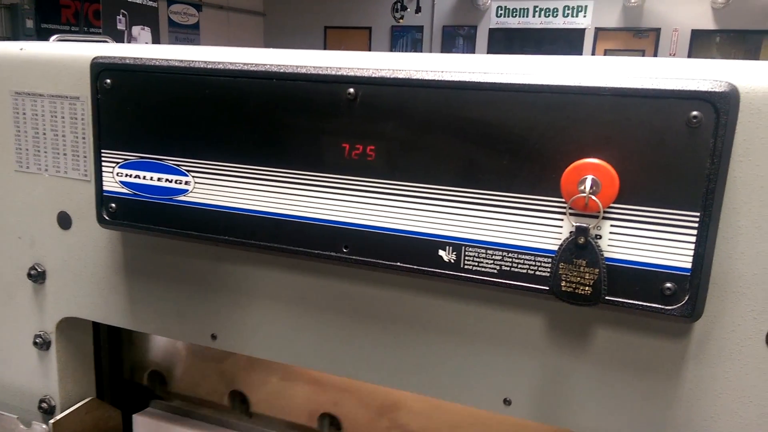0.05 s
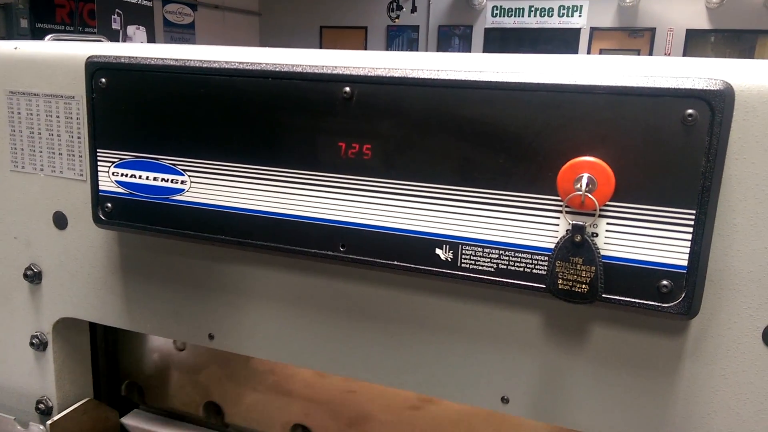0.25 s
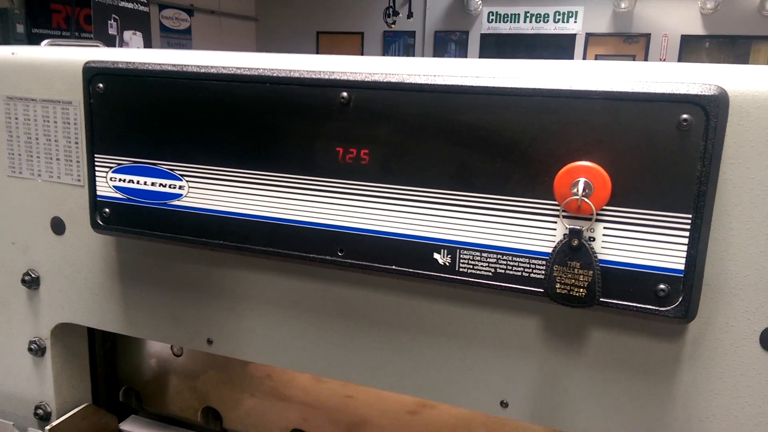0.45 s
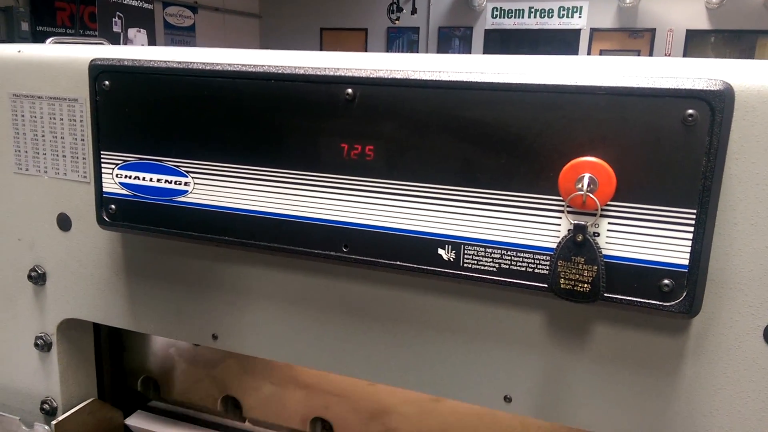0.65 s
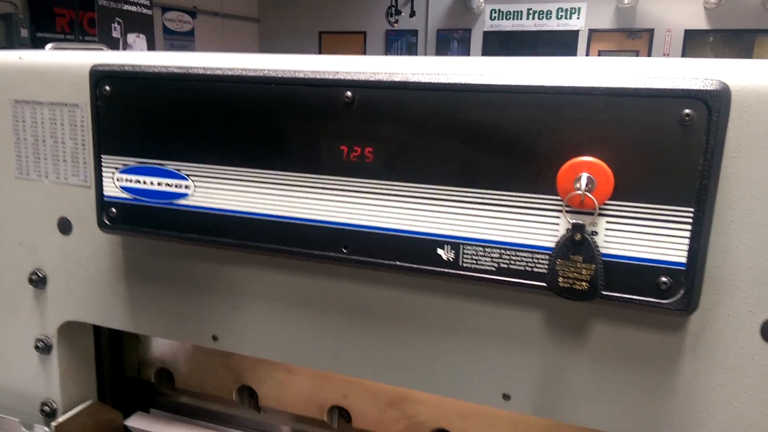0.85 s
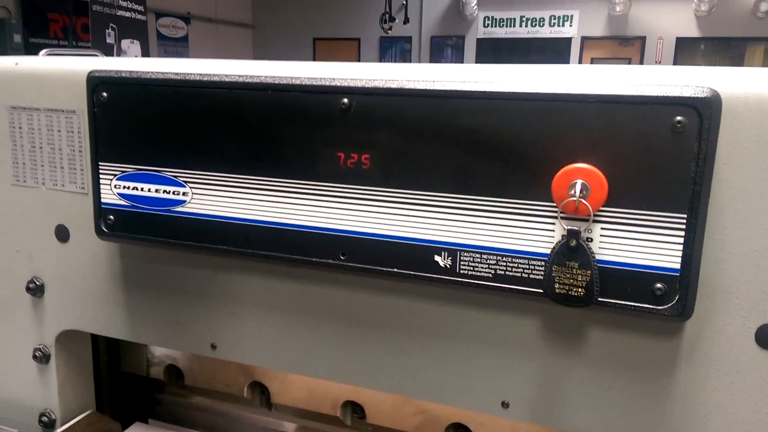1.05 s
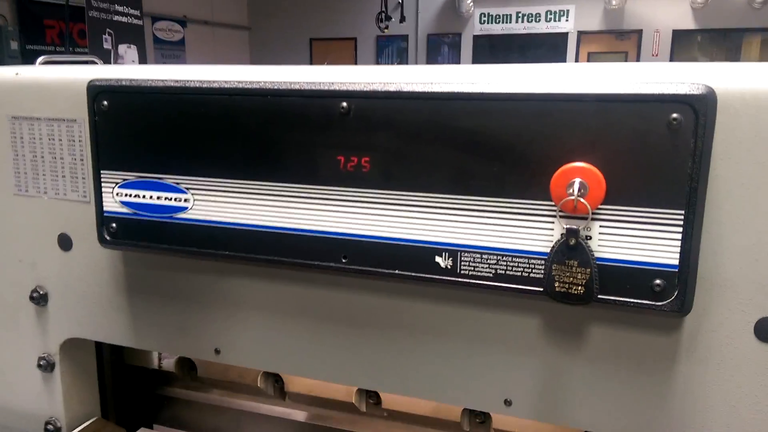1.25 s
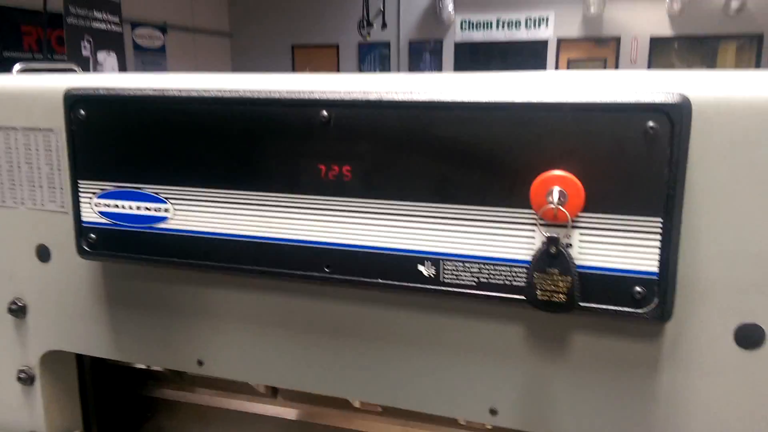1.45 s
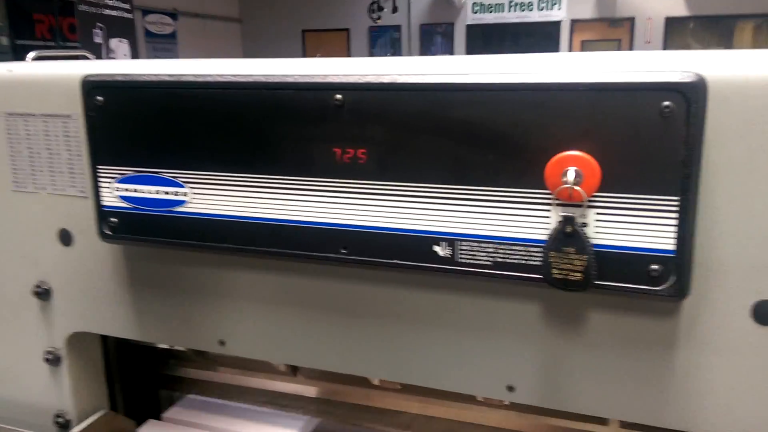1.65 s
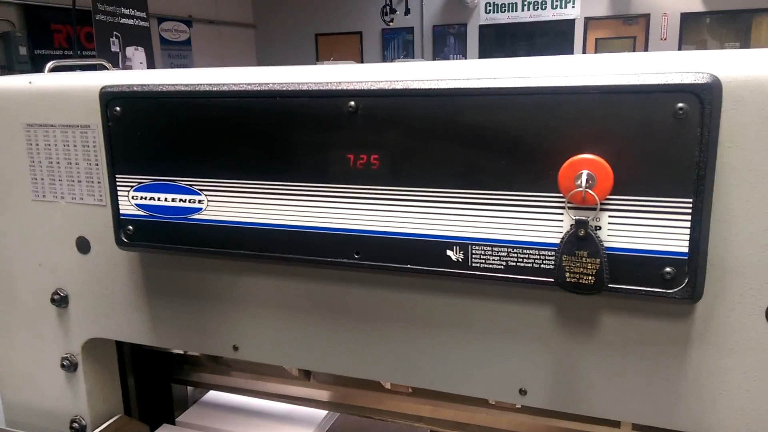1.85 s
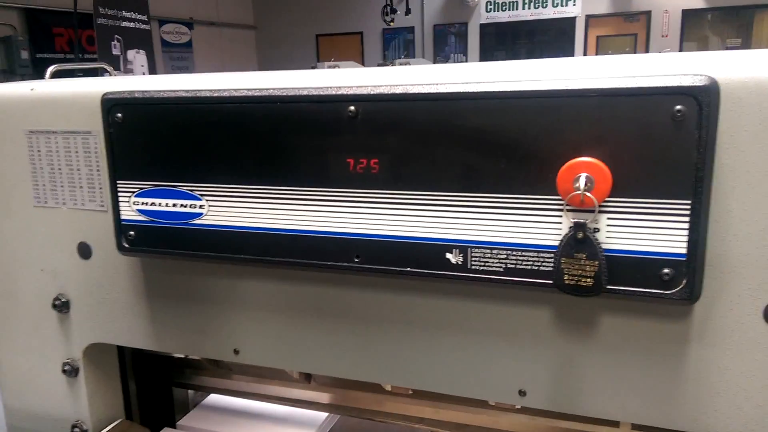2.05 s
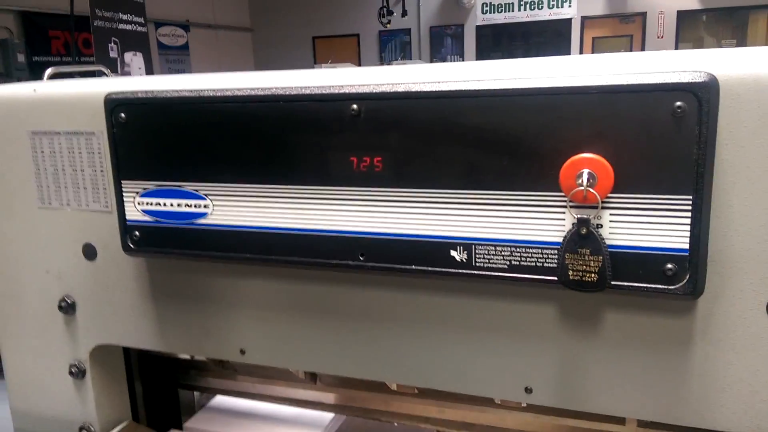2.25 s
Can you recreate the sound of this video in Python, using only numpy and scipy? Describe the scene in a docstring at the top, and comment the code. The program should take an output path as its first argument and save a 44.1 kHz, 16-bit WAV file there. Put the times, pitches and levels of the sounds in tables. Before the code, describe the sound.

Close up, a paper guillotine clacks, hisses with a short squeal, then clamps and shears a stack with quick, ringing thuds. Two more knocks follow as it returns, echoing in the workshop over a steady motor hum and pump whine.

```python
"""A pump hums and whines, then a hydraulic paper guillotine makes one cut, close by in a workshop.
The vane pump clatters with each shaft turn and runs slower under load. A valve clacks, oil hisses and
squeals through it, the clamp lands, the blade shears the stack and bottoms out; then blade and clamp
knock home. Every blow rings the heavy frame and its steel panels into the room."""
import sys
import numpy as np
from scipy import signal
from scipy.fft import rfft, irfft, next_fast_len
from scipy.io import wavfile
from scipy.ndimage import uniform_filter1d, map_coordinates

SR = 44100
rng = np.random.default_rng(int(sys.argv[2]) if len(sys.argv) > 2 else 0)


def file_out(sig):
    """Save sig as 16-bit WAV at sys.argv[1]."""
    # one column per channel
    cols = np.atleast_2d(sig).T
    # limit, then scale
    lim = np.clip(cols, -1, 1)
    pcm = np.round(lim * 32767).astype(np.int16)
    wavfile.write(sys.argv[1], SR, pcm)


N = 101429
T = np.arange(N) / SR

# Workshop reverberation. Each row: band centre in Hz, level in dB, t60 in seconds.
ROOM_BANDS = [(100, -3.5, 0.37), (253, -9, 1.34), (720, -4.5, 1), (2000, -11, 1.75), (4870, -8, 1.3),
              (12000, -19, 0.95)]
# Microphone pair: side against mid; duller right side. Each row: frequency in Hz, gain in dB.
SIDE_GAIN = [(100, -19), (200, -20), (500, -10.5), (1000, 0.5), (3000, -1)]
RIGHT_MIC_GAIN = [(100, -1), (700, -1.5), (2000, -1), (3000, -4.5), (4200, -9), (6000, -13.5), (8000, -7),
                  (14000, -4)]
# Motor mains hum. Each row: frequency in Hz, level in dB.
HUM_TONES = [(114, -56), (232, -52)]
# Pump shaft. Each row: time in seconds, speed in turns per second.
SHAFT_SPEED = [(0, 28.8), (.14, 28.6), (.5, 28.5), (.8, 29.54), (1.0, 29.58), (1.54, 29.59), (1.68, 29.42),
               (1.85, 29.6), (2.1, 29.76), (2.3, 29.8)]
# Pump pressure. Each row: time in seconds, share from 0 to 1.
PUMP_PRESSURE = [(0, 1), (.5, 1), (.8, 0.24), (2.3, 0)]
# Pump whine. Each row: multiple of shaft rate, free level in dB, loaded level in dB.
WHINE_HARMONICS = [(4, -55, -49), (8, -51, -48), (12, -49, -54), (24, -43, -45), (34, -56, -55),
                   (36, -51, -44), (37, -62, -57), (48, -50.5, -58), (60, -54.5, -50), (61, -54, -60),
                   (72, -54.5, -51), (81, -58, -54), (84, -55.5, -53), (145, -60, -62), (171, -58, -60),
                   (174, -57, -59), (178, -59, -60), (204, -59, -61)]
# Envelopes. Each row: time in seconds, relative level in dB.
CLATTER_LEVEL = [(0, 5), (.2, 5.5), (.7, 7), (.9, 2.5), (1.3, 2), (1.55, 3), (1.8, 3.5), (2.3, 1)]
OIL_LEVEL = [(.22, -70), (.26, -36), (.39, -34.5), (.43, -29), (.53, -48), (.6, -29), (.68, -38.5),
             (.85, -97)]
SQUEAL_LEVEL = [(.32, -50), (.35, -34), (.375, -32), (.389, -29.5), (.412, -43)]
PAPER_LEVEL = [(.418, -85), (.428, -43), (.47, -45), (.535, -47), (.553, -34), (.585, -46), (.62, -52),
               (.65, -45), (.72, -75)]
# Noise spectra. Each row: frequency in Hz, relative density in dB.
AIR_SPECTRUM = [(25, 16.5), (60, 2.5), (120, 4), (200, 5.5), (450, -6.5), (900, -3), (1300, -9.5),
                (2400, -16.5), (5500, -23), (9000, -21.5), (12000, -29), (16000, -35)]
CLATTER_SPECTRUM = [(100, -16), (500, -0.5), (850, -9), (1250, -9), (1600, -1.5), (2200, 3), (3300, -5.5),
                    (5200, -2), (7500, -7), (10000, -21.5), (16000, -36)]
OIL_SPECTRUM = [(150, -51), (600, 12), (1500, 7.5), (2800, 7), (5000, 4), (6800, -32), (9000, -20),
                (16000, -23)]
PAPER_SPECTRUM = [(1000, -2), (4000, 0), (9200, 11), (12000, -4), (14500, 4), (16000, -17)]
BOOM_SPECTRUM = [(40, -54), (80, -7), (170, -8), (310, 1.5), (420, -7.5), (560, -2.5), (800, -9),
                 (1400, -15), (4000, -51)]
CLANK_SPECTRUM = [(200, -23), (600, -4), (1100, -2.5), (1700, -3.5), (2600, -6), (3500, -7.5), (5000, -40),
                  (9000, -27), (16000, -51)]
CRACK_SPECTRUM = [(800, -45), (2500, -5.5), (4000, 2.5), (6300, -1.5), (8000, -13), (11000, -25),
                  (16000, -34)]
# Modes of cast frame, steel panels and linkage, small latch parts.
# Each row: frequency in Hz, relative level in dB, t60 in seconds.
FRAME_MODES = [(90, -7, .25), (116, -4, .45), (172, -8, .15), (205, -9, .18), (236, -3, .34), (296, -8, .2),
               (345, -15, .3), (530, -16, .18), (590, -18, .3)]
STEEL_MODES = [(565, -7, .2), (592, -9, .45), (773, -13, .2), (890, -12, .12), (1068, -6, .18),
               (1125, -12, .15), (1300, -12, .12), (1593, -13, .1), (1695, -7, .17), (1878, -9, .16),
               (2158, -10, .17), (2360, -14, .22), (2495, -11, .13), (2720, -14, .17), (2864, -16, .24),
               (3335, -13, .19)]
LATCH_MODES = [(4330, -13, .15), (4673, -17, .2), (4930, -12, .13), (5254, -15, .15), (5900, -12, .07),
               (6288, -14, .1)]
# Blows. Each row: start in seconds, thump level in dB, thump pitch in Hz, thump t60 in seconds,
# relative levels of frame ring, panel boom, steel clank and crack in dB, rise in seconds,
# rattle decay in seconds, favoured mode pitch in Hz.
BLOWS = [(.004, -29, 117, .1, -41, -34.5, -37.5, -69, 0.0029, 0.068, 600),
         (0.2136, -46, 264, 0.058, -58, -26, -19.5, -22, 0.0014, 0.018, 4450),
         (0.2186, -1, 211.6, 0.094, -15.5, -15, -18.5, -27.5, 0.00097, 0.026, 1640),
         (0.398, -17.5, 270, 0.22, -18.5, -21, -27.5, -62, 0.0015, 0.049, 800),
         (.413, -8.5, 179.6, 0.2, -24.5, -23, -47, -60, 0.0097, 0.025, 600),
         (.431, -17, 287, 0.067, -26, -24, -27, -35.5, 0.012, 0.0041, 2410),
         (0.5407, -10, 291, 0.031, -17, -16, -22, -32, 0.0024, 0.0096, 2700),
         (.552, -12, 558, 0.09, -25, -11.5, -19, -23, 0.0014, 0.0088, 1070),
         (.633, -10.5, 206.4, .12, -24, -17.5, -17.5, -33.5, 0.0019, 0.027, 900),
         (.646, -8.5, 166, 0.08, -21.5, -27, -19, -38, 0.0017, 0.014, 2500),
         (0.6588, -4, 191.5, 0.12, -15.5, -19.5, -59, -54, 0.0024, 0.0083, 2480),
         (1.492, -54, 252, 0.054, -64, -42, -39.5, -46, 0.021, 0.022, 3300),
         (1.562, -35, 312, 0.068, -53, -27.5, -32.5, -35, 0.011, 0.01, 1350),
         (1.577, -15.5, 204, 0.074, -25, -23.5, -26, -53, 0.0037, 0.021, 1340),
         (1.603, -9.5, 225, 0.035, -49, -23, -58, -63, 0.0026, 0.0097, 600),
         (1.852, -13.5, 359.4, 0.12, -50, -22.5, -11, -21, 0.0051, 0.012, 3060),
         (1.867, -11, 199, 0.089, -22, -27, -26, -50, 0.0016, 0.12, 627),
         (2.012, -30.5, 126.3, 0.29, -28.5, -48, -48, -64, 0.0036, 0.02, 1730)]


def amp(db):
    """Decibels to gain."""
    return 10 ** (np.asarray(db) / 20)


def unit(x):
    """Scale to rms 1."""
    return x / np.sqrt(np.mean(x ** 2))


def curve(rows):
    """Join (seconds, value) points by straight lines."""
    return np.interp(T, *np.array(rows).T)


def bin_gains(rows, size):
    """Gain per FFT bin from (Hz, dB) points."""
    hz, db = np.array(rows).T
    return amp(np.interp(np.log(np.fft.rfftfreq(size, 1 / SR) + 1), np.log(hz), db))


def colour(x, rows):
    """Minimum-phase filter through (Hz, dB) points."""
    size = 2 * next_fast_len(N)
    cepstrum = irfft(np.log(bin_gains(rows, size)))
    cepstrum[1:size // 2] *= 2
    cepstrum[size // 2 + 1:] = 0
    return irfft(rfft(x, size) * np.exp(rfft(cepstrum)))[..., :N]


def spread(pair):
    """Two unrelated signals to stereo: alike in the bass, unrelated in the treble."""
    width = bin_gains(SIDE_GAIN, N)
    mid, side = rfft(pair)
    return irfft(np.array([mid + width * side, mid - width * side]) / np.sqrt(1 + width ** 2), N)


def noise(spectrum):
    """Coloured stereo noise, rms 1."""
    return unit(colour(spread(rng.standard_normal((2, N))), spectrum))


def wander(rate_hz):
    """Random drift, deviation near 1."""
    hold = int(SR / rate_hz)
    steps = rng.standard_normal(400)[np.minimum(np.arange(N) // hold, 399)]
    return 1.3 * uniform_filter1d(steps, hold)


def workshop_reverb(x, onset_s=0.0087):
    """Diffuse tail with its own level and decay per band."""
    log_hz = np.log(np.fft.rfftfreq(N, 1 / SR) + 1)
    log_centres = np.log(np.array(ROOM_BANDS)[:, 0])
    white = rfft(spread(rng.standard_normal((2, N))))
    tail = 0
    for (_, db, t60_s), pick in zip(ROOM_BANDS, np.eye(len(ROOM_BANDS))):
        band = irfft(white * np.interp(log_hz, log_centres, pick), N)
        fade = np.exp(-np.log(1000) * T / t60_s) * (1 - np.exp(-T / onset_s))
        tail += amp(db) * band * fade / np.sqrt(np.sum(fade ** 2))
    return signal.fftconvolve(x, tail, axes=1)[:, :N]


def motor(waver_db=1, air_db=-39.5):
    """Wavering mains hum and steady moving air."""
    hum = 0
    for hz, db in HUM_TONES:
        peak = np.sqrt(2) * amp(db + waver_db * wander(10))
        hum += peak * np.sin(2 * np.pi * (hz * T + rng.random()))
    return hum + amp(air_db) * noise(AIR_SPECTRUM)


def pump_clatter(turns, vanes=12, vane_depth=0.61, gain_db=-45.5):
    """Noise that repeats each shaft turn, pulsed by the vanes."""
    one_turn = rng.standard_normal((2, 1400))
    position = turns % 1 * one_turn.shape[1]
    clatter = np.array([map_coordinates(row, [position], order=3, mode="grid-wrap") for row in one_turn])
    clatter *= 1 + vane_depth * np.cos(2 * np.pi * vanes * turns)
    return unit(colour(spread(clatter), CLATTER_SPECTRUM)) * amp(gain_db + curve(CLATTER_LEVEL))


def pump(waver_db=1, speed_wobble=0.0001):
    """Clatter and vane whine locked to the shaft; pressure rebalances the harmonics."""
    turns = np.cumsum(curve(SHAFT_SPEED) * (1 + speed_wobble * wander(10.1))) / SR
    pressure = curve(PUMP_PRESSURE)
    out = pump_clatter(turns)
    for multiple, free_db, loaded_db in WHINE_HARMONICS:
        stereo_rad = np.pi / 4 * min(multiple / 60, 1) * np.array([[1], [-1]])
        db = free_db + (loaded_db - free_db) * pressure + waver_db * wander(6.97)
        out += np.sqrt(2) * amp(db) * np.sin(2 * np.pi * (multiple * turns + rng.random()) + stereo_rad)
    return out


def valve(squeal_hz=1335, sag_hz_per_s=400, jitter=0.0176, rough_db=2, octave_db=-9):
    """Oil hisses through the valve, which squeals roughly, pitch sagging, until the clamp lands."""
    start_s, end_s = SQUEAL_LEVEL[0][0], SQUEAL_LEVEL[-1][0]
    hz = (squeal_hz - sag_hz_per_s * (T - start_s)) * (1 + jitter * wander(119.4))
    phase_rad = 2 * np.pi * np.cumsum(hz) / SR + np.array([[0], [0.5]])
    level = amp(curve(SQUEAL_LEVEL) + rough_db * wander(190)) * (T > start_s) * (T < end_s)
    squeal = level * (np.sin(phase_rad) + amp(octave_db) * np.sin(2 * phase_rad))
    return squeal + amp(curve(OIL_LEVEL)) * noise(OIL_SPECTRUM)


def paper(flutter_db=3):
    """The stack hisses as it is squeezed and sheared."""
    return amp(curve(PAPER_LEVEL) + flutter_db * wander(103.2)) * noise(PAPER_SPECTRUM)


def ring(modes, start_s, phases_rad=0):
    """Struck modes as decaying sines."""
    hz, db, t60_s = np.array(modes).T[:, :, None]
    first = int(start_s * SR)
    age_s = T[:min(N - first, SR // 3)]
    partials = amp(db - 60 * age_s / t60_s) * np.sin(2 * np.pi * hz * age_s + phases_rad)
    out = np.zeros(N)
    out[first:first + len(age_s)] = partials.sum(axis=0)
    return out


def contact_modes(modes, favoured_hz, boost_db=7, width_octaves=0.2):
    """The point of contact favours modes near one pitch."""
    hz, db, t60_s = np.array(modes).T
    nearness = np.exp(-(np.log2(hz / favoured_hz) / width_octaves) ** 2)
    return np.column_stack([hz, db + boost_db * nearness, t60_s])


def blows(thud_rise_s=0.0045, steel_trim_db=-7, crack_trim_db=5):
    """Each blow thumps, rings frame, steel and latch, and sets loose parts rattling."""
    out, rattle_power = np.zeros((2, N)), np.zeros((3, N))
    for (start_s, thump_db, thump_hz, thump_t60_s, frame_db, boom_db, clank_db, crack_db,
         rise_s, decay_s, favoured_hz) in BLOWS:
        age_s = np.maximum(T - start_s, 0)
        thump = ring([(thump_hz, thump_db, thump_t60_s)], start_s)
        frame = amp(frame_db) * ring(FRAME_MODES, start_s)
        out += (thump + frame) * (1 - np.exp(-age_s / thud_rise_s))
        attack = np.minimum(age_s / rise_s, 1)
        for modes, db in (STEEL_MODES, clank_db + steel_trim_db), (LATCH_MODES, crack_db):
            struck = contact_modes(modes, favoured_hz)
            stereo_rad = rng.uniform(0, 2 * np.pi, (2, len(modes), 1))
            out += amp(db) * attack * np.array([ring(struck, start_s, rad) for rad in stereo_rad])
        envelope = attack * np.exp(-np.maximum(age_s - rise_s, 0) / decay_s)
        rattle_power += (amp([[boom_db], [clank_db], [crack_db + crack_trim_db]]) * envelope) ** 2
    for power, spectrum in zip(rattle_power, (BOOM_SPECTRUM, CLANK_SPECTRUM, CRACK_SPECTRUM)):
        out += np.sqrt(power) * noise(spectrum)
    return out


def scene():
    """One cutting stroke in the room, over pump and motor."""
    stroke = blows() + valve() + paper()
    return stroke + workshop_reverb(stroke) + pump() + motor()


def record(dry, low_cut_hz=75, top_hz=15800):
    """Duller right microphone, bass cut, rounded peaks, top cut."""
    low_cut = signal.butter(2, low_cut_hz, "high", fs=SR, output="sos")
    top_cut = signal.ellip(10, 0.2, 80, top_hz, fs=SR, output="sos")
    mics = np.array([dry[0], colour(dry[1], RIGHT_MIC_GAIN)])
    rounded = np.tanh(0.91 * signal.sosfilt(low_cut, mics)) / 0.68
    return signal.sosfilt(top_cut, rounded)


dry = scene()
out = record(dry)
file_out(out)
```